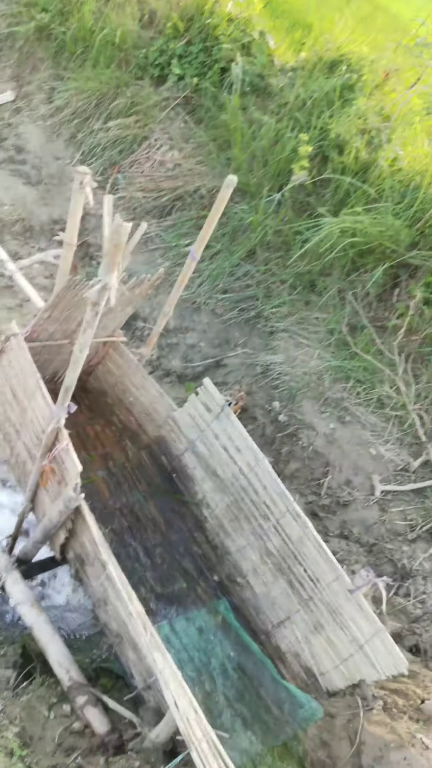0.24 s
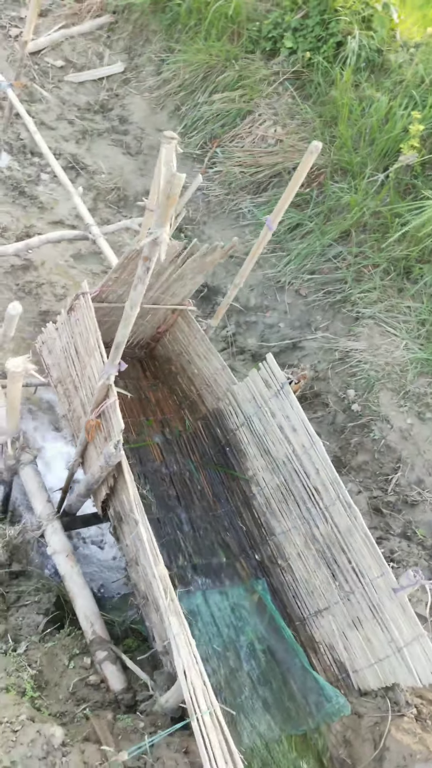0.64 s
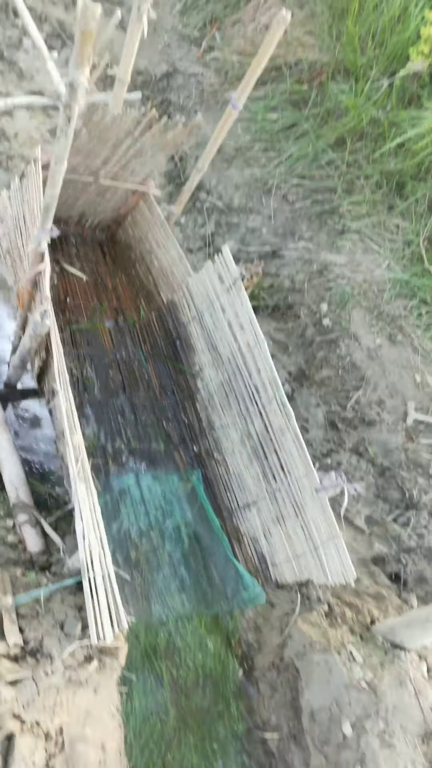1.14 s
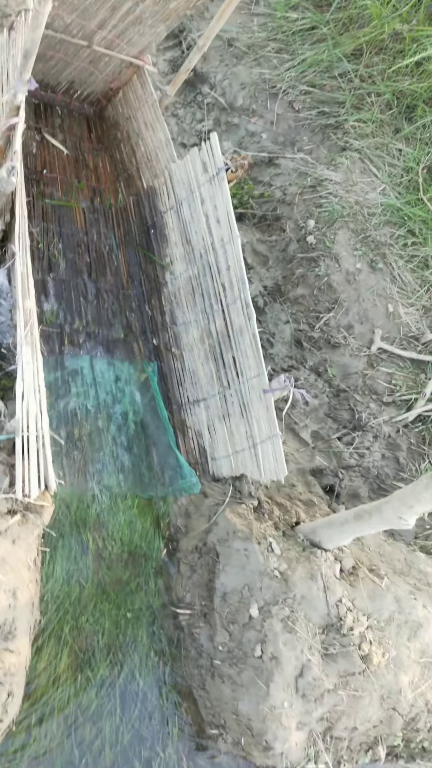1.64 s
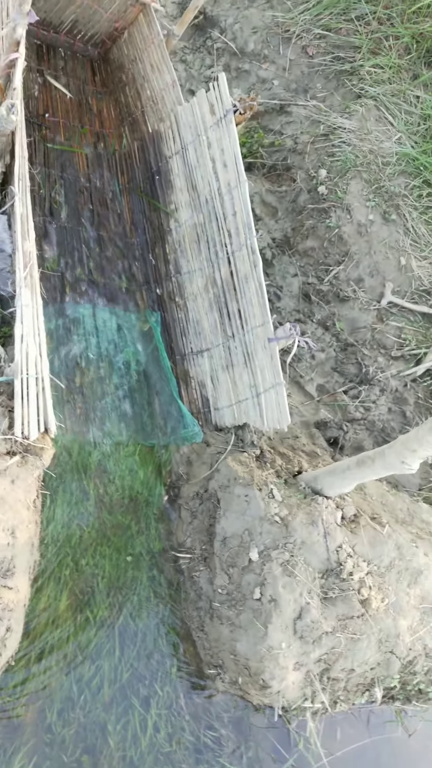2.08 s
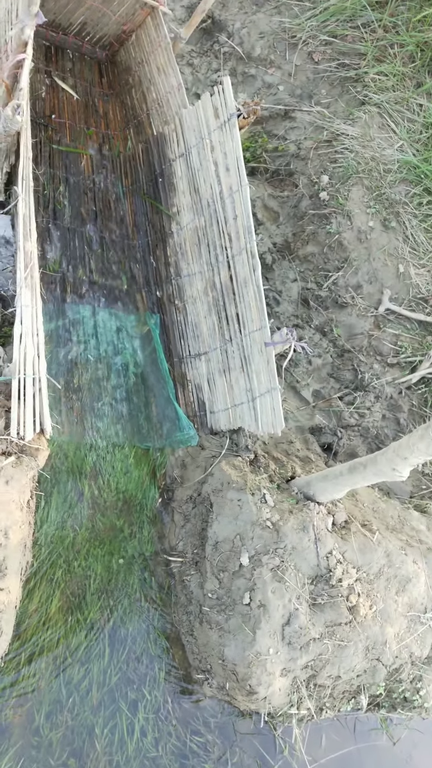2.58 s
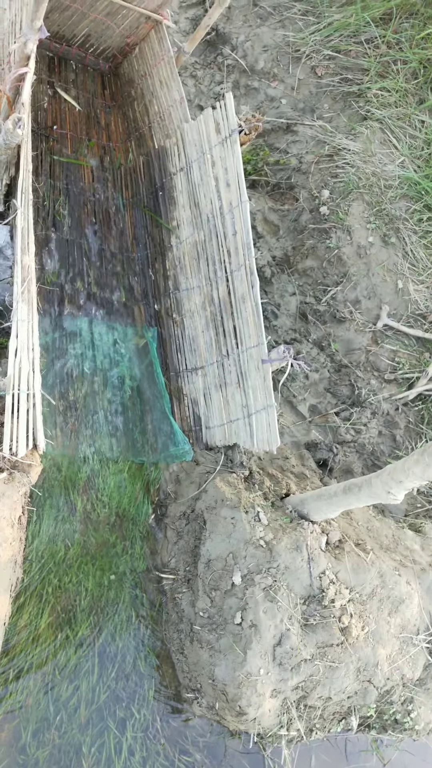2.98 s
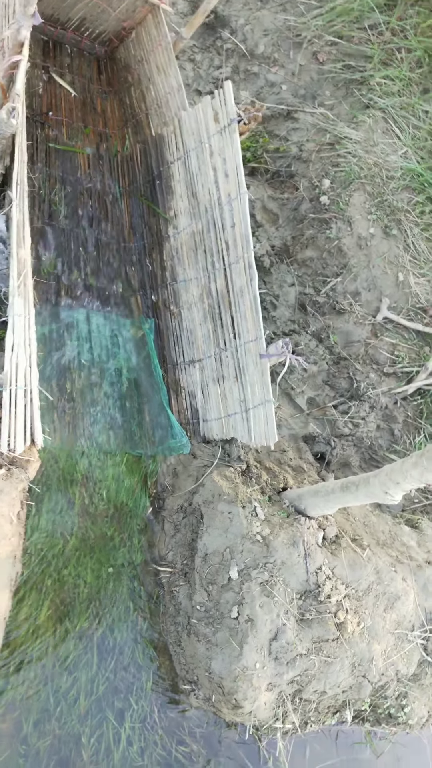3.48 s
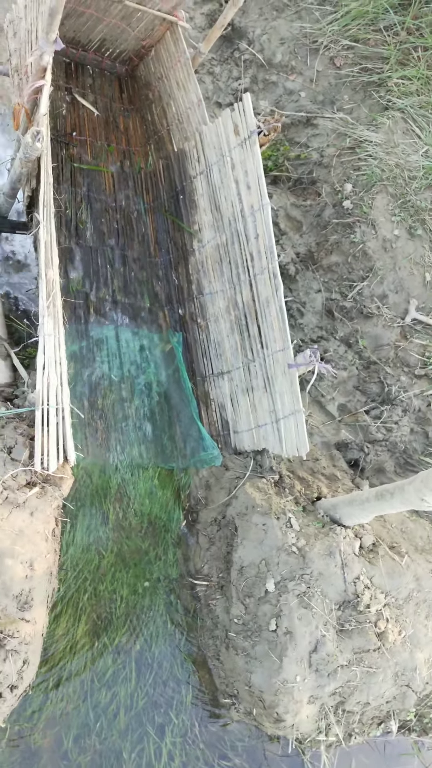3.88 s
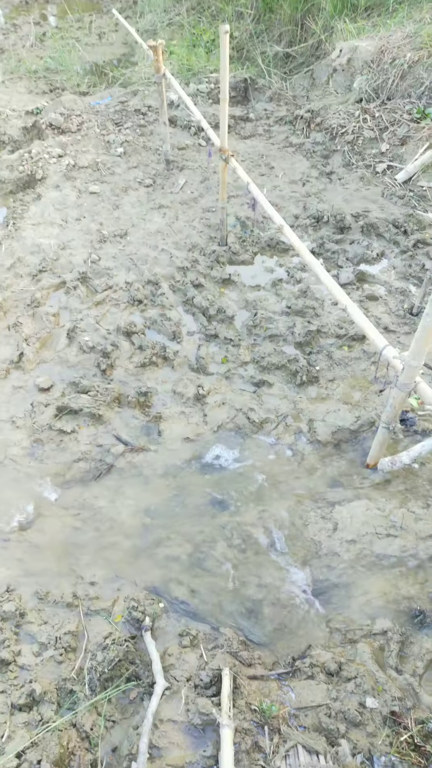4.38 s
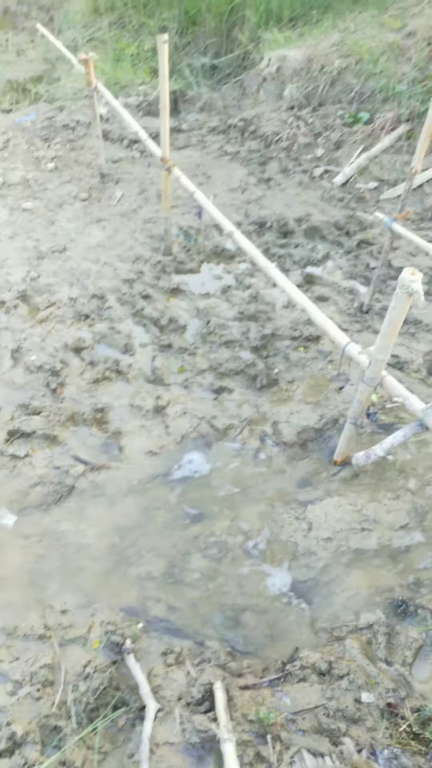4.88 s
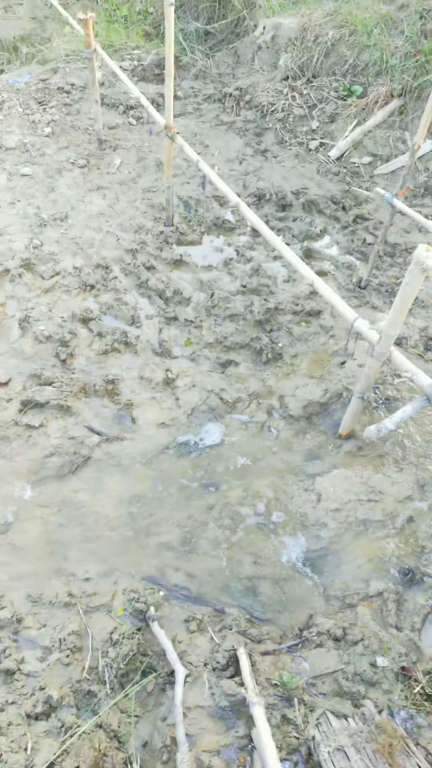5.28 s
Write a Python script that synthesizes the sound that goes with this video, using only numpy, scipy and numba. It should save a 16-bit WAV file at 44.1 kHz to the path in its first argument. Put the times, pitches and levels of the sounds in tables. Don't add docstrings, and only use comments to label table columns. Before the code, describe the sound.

A small stream hisses and burbles close by, drops plinking on the left, faint wind thuds, then a short dropout and fade back in.

```python
import sys
import numpy as np
from scipy import signal
from scipy.io import wavfile
from scipy.ndimage import uniform_filter1d, map_coordinates
from numba import njit

SR = 44100
rng = np.random.default_rng(int(sys.argv[2]) if len(sys.argv) > 2 else 0)


def magnitude_from_level(level_db):
    exponent = np.asarray(level_db, float) / 20
    return 10 ** exponent


def bounce(signal):
    frames = np.transpose(np.atleast_2d(signal))
    limited = np.clip(frames, -1, 1)
    pcm = np.round(limited * 32767).astype(np.int16)
    wavfile.write(sys.argv[1], SR, pcm)


N = 244090

PAUSE_S, RESUME_S = 4.2828, 4.4485
FADE_FROM_S, FADE_TO_S = 4.399, 4.675
WINDOW = 512


def to_cells(x, size=WINDOW):
    return signal.stft(x, SR, nperseg=size, noverlap=size * 3 // 4)


def to_sound(cells, size=WINDOW):
    return signal.istft(cells, SR, nperseg=size, noverlap=size * 3 // 4)[1][..., :N]


def along(table, hz):
    f, value = np.transpose(table)
    return np.interp(np.log(hz + 1), np.log(f), value).reshape(len(hz), -1)


def walk(shape, span):
    span = max(int(span), 1)
    levels = uniform_filter1d(rng.standard_normal(shape), span)
    levels = uniform_filter1d(levels, span)
    return levels / levels.std()


@njit
def ring(n, start, turn, fade, glide, size):
    out = np.zeros(n)
    for k in range(len(start)):
        tone = size[k] + 0j
        advance = fade[k] * np.exp(1j * turn[k])
        bend = np.exp(1j * glide[k])
        i = start[k]
        while i < n and abs(tone) > .01 * abs(size[k]):
            out[i] += tone.imag
            tone = tone * advance
            advance = advance * bend
            i += 1
    return out


def bubbles(s, hz, size, cycles, rise):
    turn = 2 * np.pi * hz / SR
    length = cycles * SR / hz
    return ring(N, (s * SR).astype(np.int64), turn, np.exp(-1 / length), rise * turn / length, 1. * size)


def swelling_bubbles(s, hz, size, decay, attack, rise=0.):
    slow = bubbles(s, hz, size, np.full(len(s), decay), rise)
    quick = bubbles(s, hz, size, np.full(len(s), attack), rise)
    return slow - quick


def froth(spread_db, cycles, hiss_db, count):
    when, pitch, strength, damping = rng.random((count, 4)).T
    hz = 150 * 100 ** pitch ** .8
    size = magnitude_from_level(-spread_db * np.log(1 - .9995 * strength))
    size = size * np.sqrt(hz)
    f, s, swarm = to_cells(bubbles(when * N / SR, hz, size, cycles * (.5 + damping), rise=0.1327))
    mean = uniform_filter1d(np.mean(abs(swarm) ** 2, axis=1), size=3)[:, None]
    hiss = to_cells(rng.standard_normal(N))[2]
    hiss = hiss / np.sqrt(np.mean(abs(hiss) ** 2))
    both = swarm / np.sqrt(mean) + magnitude_from_level(hiss_db) * hiss
    return f, s, both / np.sqrt(1 + magnitude_from_level(2 * hiss_db))


def surges(f, s):
    octaves = np.log2(np.maximum(f, 60) / 60)

    def spread(rows, per_octave):
        at = np.meshgrid(octaves * per_octave, np.arange(len(s)), indexing="ij")
        return map_coordinates(rows, at, order=1)

    swell = spread(walk((9, len(s)), 22), 1)
    flicker = spread(walk((35, len(s)), 6), 4)
    return 0.56 * swell + 1.4 * flicker


# before the swing in microseconds, after it in microseconds.
SWING_LAG = (-150, 135)


def turning(s):
    swing_at_s, swing_half_s = 1.3, .4
    facing_from, facing_to = 0.86, 0.05
    ditch_lag_us, ditch_turn_per_s = -142, .38
    swing = (1 + np.tanh((s - swing_at_s) / swing_half_s)) / 2
    at_chute = s < RESUME_S - .05
    chute_facing = facing_from + (facing_to - facing_from) * swing
    facing = np.where(at_chute, chute_facing, ditch_turn_per_s * (s - RESUME_S))
    before, after = SWING_LAG
    lag_us = np.where(at_chute, before + (after - before) * swing, ditch_lag_us)
    return facing, lag_us / 10 ** 6


# time in seconds, centre in Hz, gain in dB.
EDGE_SHADE = [(0, 8140, 1.5), (.4, 8450, -5.5), (.9, 8750, -11), (1.3, 10240, -8), (1.6, 9100, -1),
              (2.0, 8940, -7.5), (4.3, 8970, -7), (4.5, 9360, -15), (4.9, 9280, -3), (5.149, 9340, -6),
              (5.5, 9000, -3.5)]
# centre in Hz, width in Hz, gain in dB.
PORT_NOTCH = (6650, 340, -2)


def dips(f, s):
    at, hz, db = np.transpose(EDGE_SHADE)
    edge_width_hz = 840
    edge_offset = (f[:, None] - np.interp(s, at, hz)) / edge_width_hz
    edge_db = np.interp(s, at, db) * np.exp(-edge_offset ** 2)
    port_hz, port_width_hz, port_db = PORT_NOTCH
    return edge_db, port_db * np.exp(-((f[:, None] - port_hz) / port_width_hz) ** 2)


# frequency in Hz, level in dB per Hz.
CHUTE_AT_LEFT = [(300, -2.5), (700, -5), (1100, -7), (1600, -3.5), (1950, -6), (2500, 4.5), (3100, -6.5),
                 (4150, -10.5), (5250, -2), (6700, -15), (7900, -21.5), (8900, -24), (10600, -26),
                 (12000, -29), (13300, -21.5), (15000, -16.5)]
# frequency in Hz, level in dB per Hz.
CHUTE_AT_RIGHT = [(300, -1.5), (700, -5), (1100, -5.5), (1600, -3.5), (1950, -5), (2500, -6.5), (3100, -8),
                  (4050, -11.5), (5250, -1), (6700, -16.5), (7900, -20.5), (8900, -27), (10500, -29.5),
                  (12100, -25.5), (13600, -22), (15000, -16)]
# frequency in Hz, level in dB per Hz.
DITCH_AT_LEFT = [(300, -3), (700, -4), (1100, -4.5), (1500, -2), (1900, -1.5), (2500, -2), (3100, -6.5),
                 (3900, -15), (5250, -1.5), (6700, -14), (8300, -21.5), (9400, -26.5), (10500, -24.5),
                 (11500, -30.5), (13600, -17.5), (15000, -18.5)]
# frequency in Hz, level in dB per Hz.
DITCH_AT_RIGHT = [(300, -3), (700, -4.5), (1100, -3.5), (1500, -2.5), (1900, -3), (2500, -1.5),
                  (3300, -5.5), (4050, -10), (5250, -1), (6700, -14), (8300, -25.5), (9500, -32),
                  (11500, -31), (12500, -28.5), (13800, -22.5), (15000, -16.5)]
# frequency in Hz, gain in dB.
FACING_GAIN = [(200, 0), (600, 5), (1500, 1), (2500, 0), (2900, 3.5), (3600, -2), (5250, 5.5), (7000, 3.5),
               (8300, 4.5), (9500, 7.5), (11500, 10.5), (13000, 7), (15000, 2.5)]
# frequency in Hz, gain in dB.
PHONE_SHADOW = [(300, -1), (2500, -1), (3600, -3), (5300, -2.5), (7400, 0), (10500, 0.5), (12000, 2.5)]
# frequency in Hz, gain in dB.
BASS_ROLLOFF = [(20, -40), (60, -3.5), (130, -9), (250, 1.5)]
# frequency in Hz, likeness from 0 to 1.
PORT_LIKENESS = [(100, 1), (350, 1), (700, .8), (1300, .55), (2500, .62), (3600, 0.4), (4600, 0.2),
                 (6000, .2), (15000, 0.07)]


def water():
    chute_db, ditch_db, ditch_rise_db_per_s = -54, -56.5, 2.5
    slide = 0.035
    f, s, near = froth(spread_db=2.5, cycles=3.5, hiss_db=1.5, count=60000)
    far = [froth(spread_db=2.0, cycles=3.0, hiss_db=2, count=60000)[2] for _ in range(2)]

    facing, lag_s = turning(s)
    like = np.clip(along(PORT_LIKENESS, f), 0, 1)
    shared = np.sqrt(like) * near
    delay = np.exp(-2j * np.pi * f[:, None] * lag_s)
    left = shared * delay + np.sqrt(1 - like) * far[0]
    right = shared + np.sqrt(1 - like) * far[1]

    at_chute = s < RESUME_S - .05
    flow_db = np.where(at_chute, chute_db, ditch_db + ditch_rise_db_per_s * (s - FADE_TO_S))
    edge_db, port_db = dips(f, s)
    shared_db = along(BASS_ROLLOFF, f) + surges(f, s) + port_db + flow_db
    chute_left_db = along(CHUTE_AT_LEFT, f[:, None] * (1 + slide * facing))
    left_db = np.where(at_chute, chute_left_db, along(DITCH_AT_LEFT, f))
    left_db = left_db + facing * along(FACING_GAIN, f) + edge_db
    chute_right_db = along(CHUTE_AT_RIGHT, f) + facing * along(PHONE_SHADOW, f)
    right_db = np.where(at_chute, chute_right_db, along(DITCH_AT_RIGHT, f))

    both = to_sound(np.array([left * magnitude_from_level(left_db + shared_db), right * magnitude_from_level(right_db + shared_db)]))
    no_rumble = signal.butter(2, 65.6, "high", fs=SR, output="sos")
    return signal.sosfilt(no_rumble, both)


# start in seconds, peak in dB, pitch in Hz, left minus right in dB.
LONE_DROPS = [(.3503, -26, 2400, 7), (.3658, -31, 2520, 10), (.4398, -31, 2450, 12), (.7573, -25, 5200, 8),
              (.9487, -31, 2380, 10), (1.3718, -30, 2200, 8), (1.4787, -31, 2430, 9),
              (1.7070, -22, 2490, 10), (1.7800, -31, 2510, 10), (2.3864, -31, 2550, 12),
              (2.5684, -29, 2510, 13), (2.6056, -21, 2520, 11), (2.6922, -25, 2515, 12),
              (2.7779, -30, 2510, 11), (3.4126, -31, 2620, 12)]


def drops():
    s, db, hz, pan_db = np.transpose(LONE_DROPS)
    ports = (db, db - pan_db)
    return np.array([swelling_bubbles(s, hz, 2 * magnitude_from_level(d), decay=3.6, attack=1.1) for d in ports])


# start in seconds, peak in dB, pitch in Hz.
SOFT_DROPS = [(0.5374, -30.5, 2320), (0.7784, -35.5, 2100), (0.889, -26, 2540), (0.9706, -32.5, 2270),
              (1.1861, -33.5, 2620), (1.4944, -34.5, 2710), (1.5846, -32, 2690), (1.668, -25, 2310),
              (1.805, -34, 2640), (2.2418, -39, 2410), (2.2687, -41.5, 2900), (2.4058, -21.5, 2380),
              (2.807, -36, 2420), (2.974, -42, 2330), (3.269, -42.5, 2350), (3.3522, -33.5, 2470),
              (3.455, -30, 2420), (3.5638, -37, 2240), (3.5965, -37.5, 2490)]


def smacks():
    s, db, hz = np.transpose(SOFT_DROPS)
    pan_db = 5
    ports = (db, db - pan_db)
    return np.array([swelling_bubbles(s, hz, 2 * magnitude_from_level(d + 1.0), decay=3.1, attack=0.78) for d in ports])


# start in seconds, peak in dB, pitch in Hz.
BIG_BUBBLES = [(0.149, -34, 278), (0.236, -35.5, 338), (0.377, -32.5, 355), (0.487, -29.5, 520),
               (0.533, -43.5, 309), (0.754, -32.5, 394), (0.864, -41, 306), (0.893, -34.5, 250),
               (0.962, -38, 290), (1.06, -37.5, 572), (1.146, -45.5, 303), (1.181, -39, 268),
               (1.229, -36.5, 321), (1.352, -37, 304), (1.635, -39.5, 345), (1.732, -34, 370),
               (2.05, -35.5, 353), (2.308, -38.5, 283), (2.481, -43.5, 310), (2.707, -35.5, 248),
               (2.815, -35, 331), (2.848, -33, 240.5), (3.051, -35.5, 316), (3.113, -32, 255),
               (3.154, -33, 461), (3.249, -36, 314), (3.495, -31, 332), (3.563, -36.5, 283),
               (3.789, -41.5, 414), (3.852, -35.5, 331), (3.986, -32.5, 322), (4.128, -38, 342),
               (4.238, -39, 307), (4.273, -44, 283), (4.454, -43.5, 279), (4.653, -36.5, 474),
               (5.005, -33.5, 550), (5.106, -37.5, 511), (5.22, -34, 482), (5.476, -35, 223)]


def gulps():
    s, db, hz = np.transpose(BIG_BUBBLES)
    return swelling_bubbles(s, hz, magnitude_from_level(db - 1.0), decay=4.1, attack=0.99, rise=.05)


# frequency in Hz, level in dB per Hz.
THUD_COLOUR = [(6, -40), (20, -16), (30, -5), (60, -2.5), (100, -0.5), (160, -7), (300, -38.5), (800, -65)]
# middle in seconds, peak in dB, half-length in seconds.
GUSTS_LEFT = [(.1, -65, 0.038), (.75, -79, 0.084), (1.2, -67, .1), (1.69, -45.5, 0.051), (1.93, -59, .04),
              (2.2, -65, 0.12), (2.62, -60, .04), (3.5, -72, 0.11), (4.9, -60, .12), (5.45, -62, 0.12)]
# middle in seconds, peak in dB, half-length in seconds.
GUSTS_RIGHT = [(.21, -59, 0.041), (.43, -53, 0.051), (.9, -49, 0.055), (1.12, -47.5, 0.092),
               (1.28, -49, 0.027), (1.47, -50.5, 0.04), (1.93, -51, 0.12), (2.03, -54, 0.036),
               (2.24, -36.5, 0.065), (2.38, -44.5, 0.036), (2.47, -41, 0.044), (3.42, -40, 0.024),
               (3.56, -37, 0.041), (3.67, -48, 0.055), (3.88, -46, 0.028), (4.17, -48.5, 0.081),
               (4.7, -54.5, 0.075), (4.95, -50, 0.17), (5.42, -46.5, 0.096)]


def wind():
    s = np.arange(N) / SR
    ports = []
    for gusts, lull_db in ((GUSTS_LEFT, -71), (GUSTS_RIGHT, -67)):
        f, _, air = to_cells(rng.standard_normal(N), size=4096)
        thud = to_sound(air * magnitude_from_level(along(THUD_COLOUR, f)), size=4096)
        strength = magnitude_from_level(lull_db)
        for at, db, half in gusts:
            strength = strength + magnitude_from_level(db) * np.exp(-((s - at) / half) ** 2)
        puffs = magnitude_from_level(2.2 * walk(N, 900))
        ports.append(thud / thud.std() * strength * puffs)
    return np.array(ports)


def scene():
    return water() + drops() + smacks() + gulps() + wind()


# frequency in Hz, rounding step in dB.
ROUNDING_STEP = [(300, -46), (1500, -40), (2500, -38), (3200, -35), (4200, -36), (5200, -36), (6200, -37),
                 (7500, -42.5), (9000, -48), (10500, -50), (12000, -47), (13500, -44), (15700, -43)]


def phone_rounding(x):
    hop, lead, top_hz = 1024, 1400, 15740
    wobble_db, band_db, follow, masking = .2, 1.8, .9, .22
    dead, weak = .33, .4
    n, k = np.arange(2 * hop), np.arange(hop)
    window = signal.windows.kaiser_bessel_derived(2 * hop, 4 * np.pi)
    basis = np.cos(np.pi / hop * np.outer(n + (1 + hop) / 2, k + .5))
    basis = basis * window[:, None] * np.sqrt(2 / hop)
    count = N // hop + 4
    halves = np.pad(x, ((0, 0), (lead, count * hop - N - lead))).reshape(2, count, hop)
    cells = np.concatenate([halves[:, :-1], halves[:, 1:]], axis=2) @ basis
    hz = k * SR / 2 / hop
    power = uniform_filter1d(uniform_filter1d(cells ** 2, 48, axis=2), 5, axis=1) + 1e-18

    even = (abs(np.log10(power[0] / power[1])) < .3) | (hz < 2000)

    def joint(c):
        return np.where(even, np.array([c[0] + c[1], c[0] - c[1]]) / np.sqrt(2), c)

    drift = np.repeat(walk((hop // 8, count - 1), 4), 8, axis=0).T
    wobble = rng.standard_normal((count - 1, 1))
    loudness = np.sqrt(np.mean(power, axis=(0, 2)) / np.mean(power))[:, None] + .01
    step_db = along(ROUNDING_STEP, hz).T + 3.0 + wobble_db * wobble + band_db * drift
    step = magnitude_from_level(step_db) * loudness ** follow
    masked = np.mean(power, axis=0) / np.mean(power, axis=(0, 1)) / loudness ** 2
    step = step * masked ** masking

    cells = joint(cells)
    whole = np.floor(abs(cells / step) ** (3 / 4) + dead) * (hz < top_hz)
    nearby = uniform_filter1d(uniform_filter1d(cells ** 2, 6, axis=2), 2, axis=1)
    whole = whole * (nearby > (weak * step) ** 2)
    blocks = joint(np.sign(cells) * whole ** (4 / 3) * step) @ basis.T
    lapped = blocks[:, 1:, :hop] + blocks[:, :-1, hop:]
    return lapped.reshape(2, -1)[:, lead - hop:lead - hop + N]


def top_cut(x):
    return signal.sosfilt(signal.butter(12, 15870, fs=SR, output="sos"), x)


def record(dry):
    s = np.arange(N) / SR
    fade = np.clip((s - FADE_FROM_S) / (FADE_TO_S - FADE_FROM_S), 0, 1)
    x = signal.sosfilt(signal.butter(2, 15, "high", fs=SR, output="sos"), dry)
    x = phone_rounding(x * np.where(s < RESUME_S - .08, 1, fade))
    remnant = magnitude_from_level(-39.5) * np.clip(1 - (s - PAUSE_S) / 0.013, 0, 1)
    gate = np.where((s < PAUSE_S) | (s >= RESUME_S), 1, remnant)
    return top_cut(x * gate)


dry = scene()
out = record(dry)
bounce(out)
```